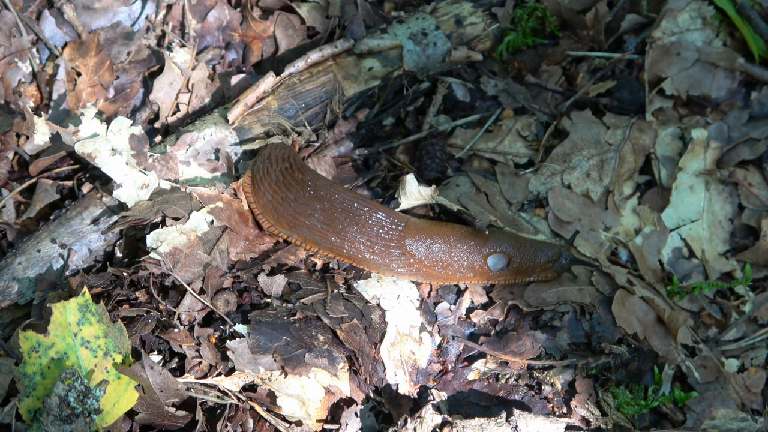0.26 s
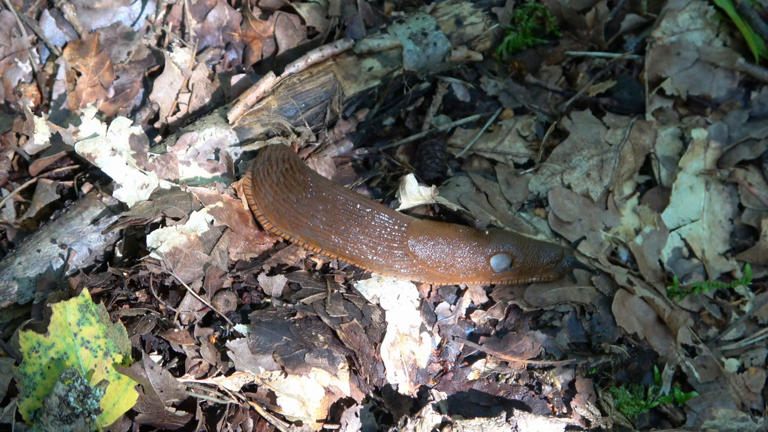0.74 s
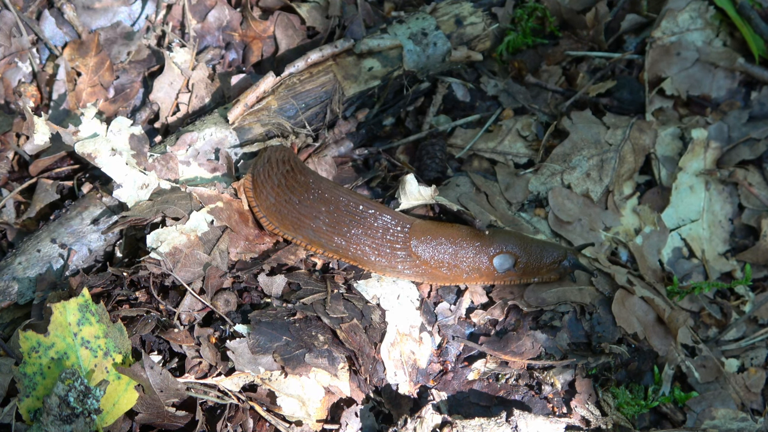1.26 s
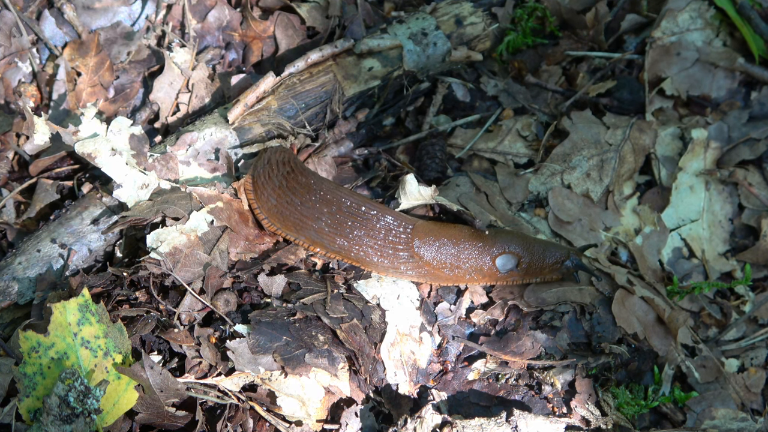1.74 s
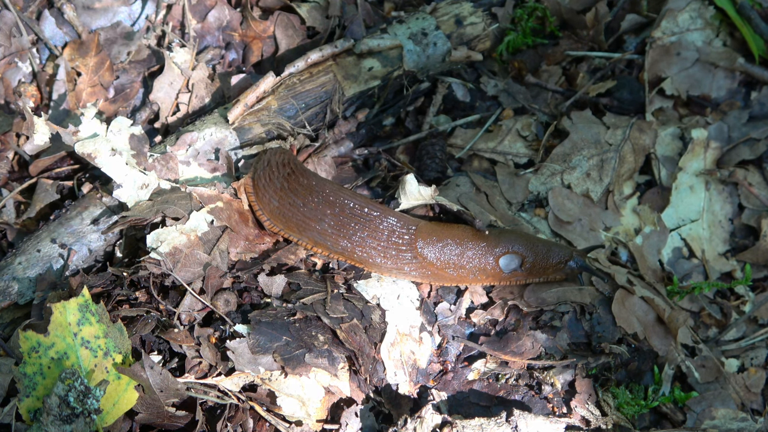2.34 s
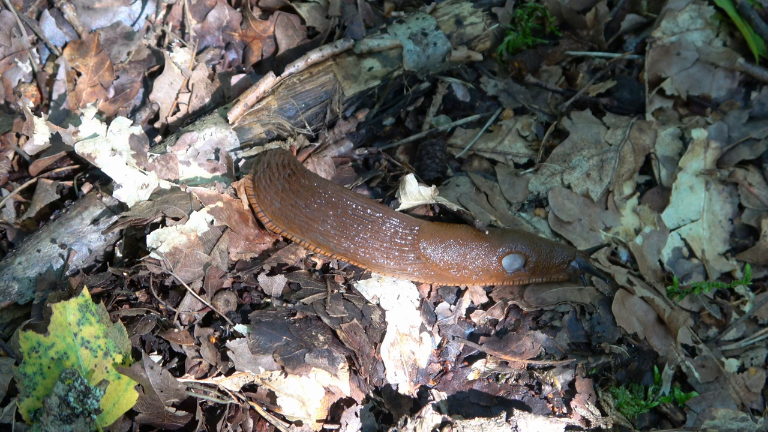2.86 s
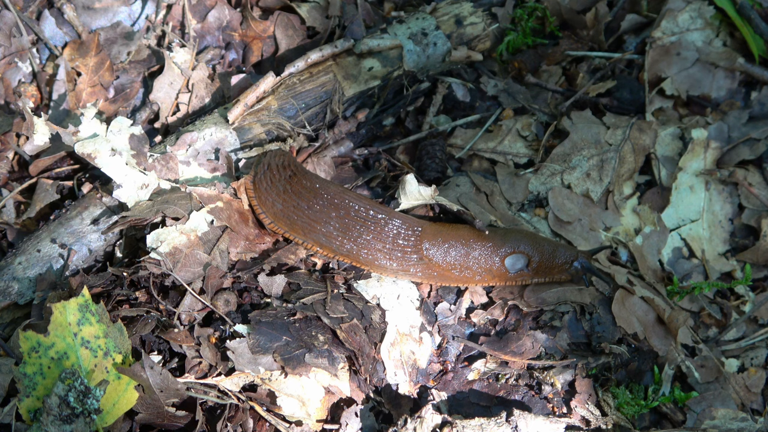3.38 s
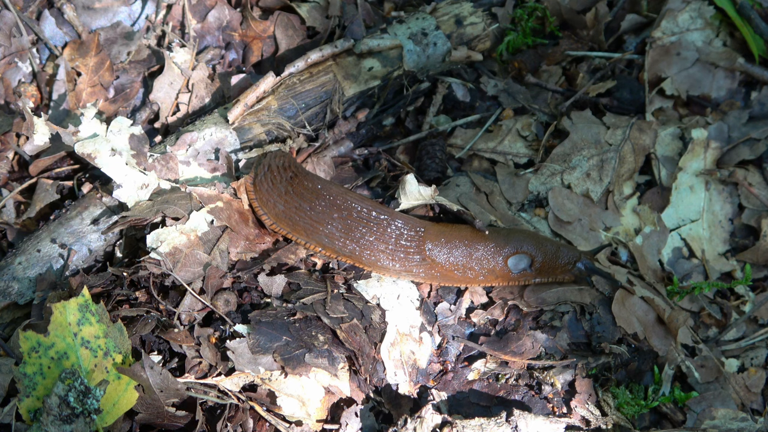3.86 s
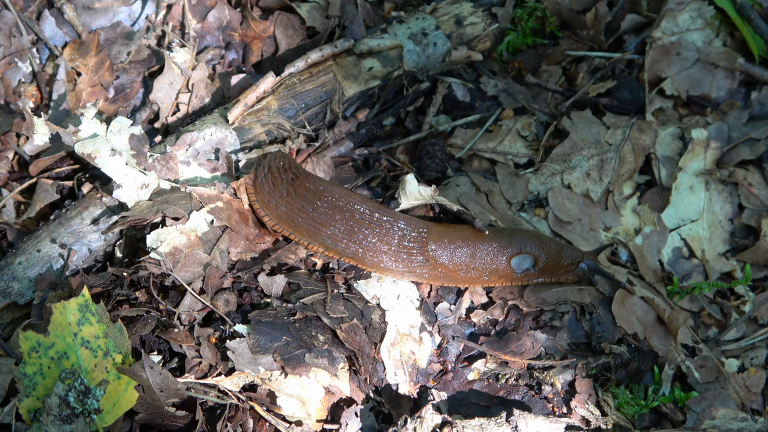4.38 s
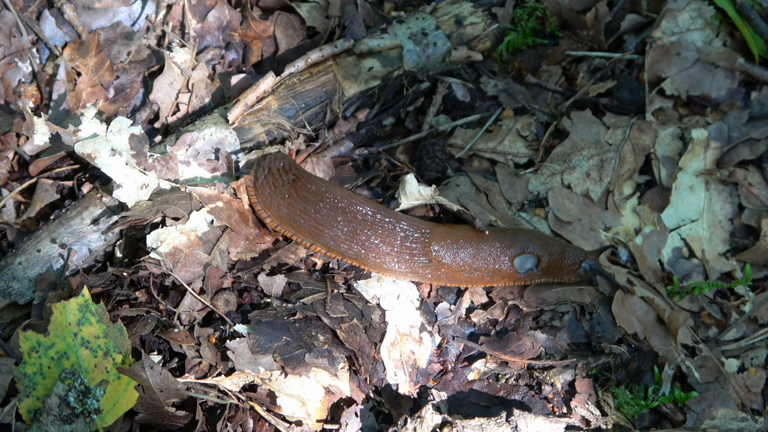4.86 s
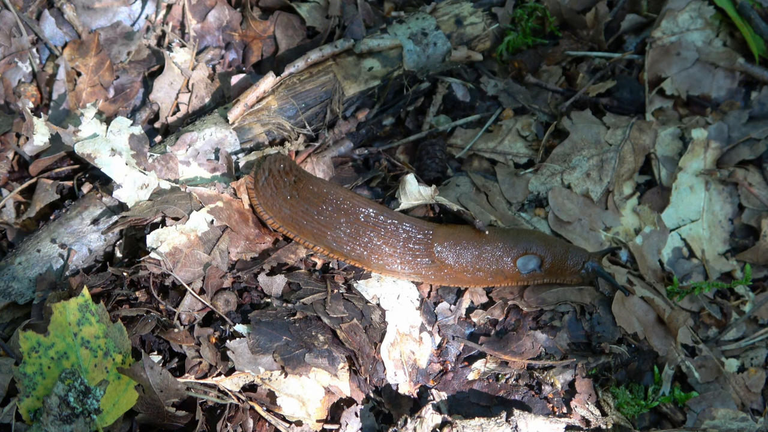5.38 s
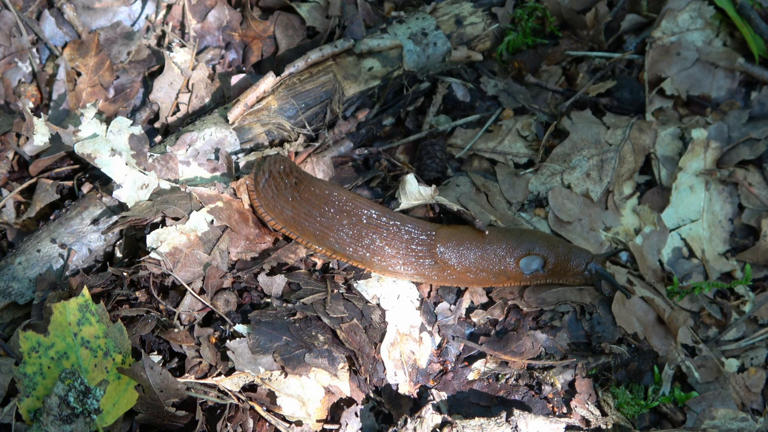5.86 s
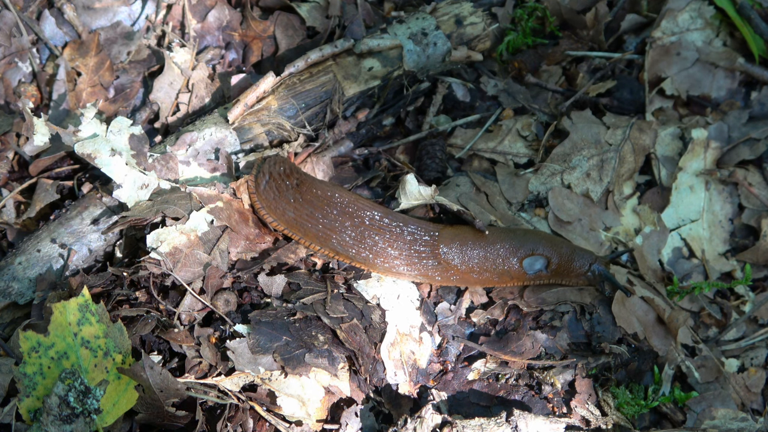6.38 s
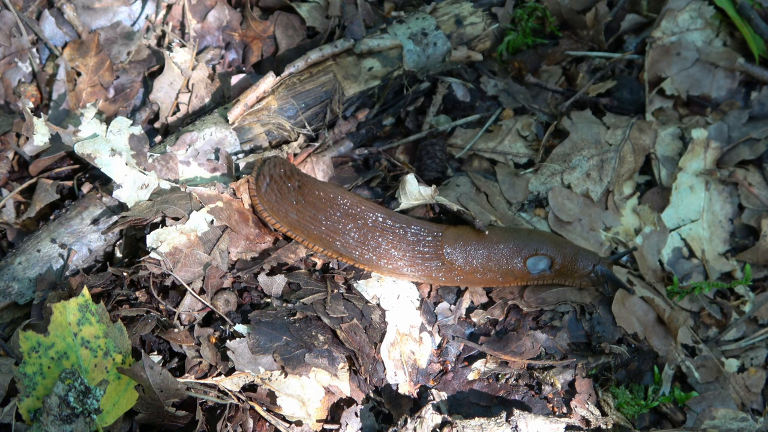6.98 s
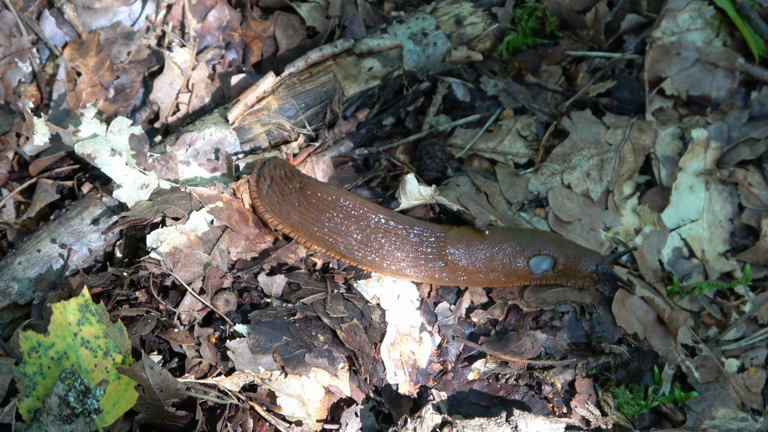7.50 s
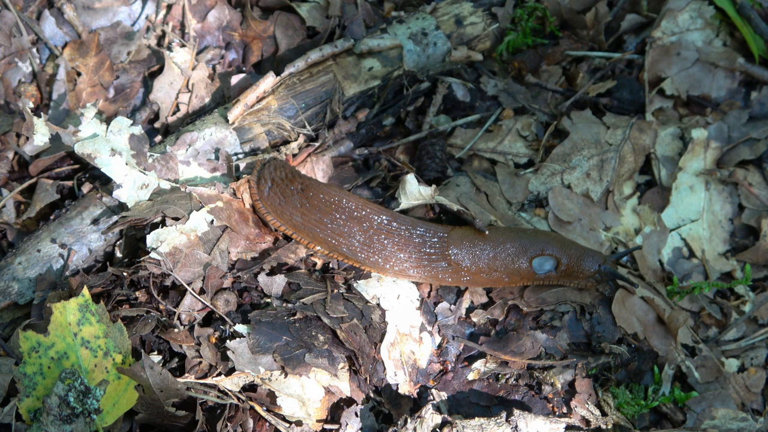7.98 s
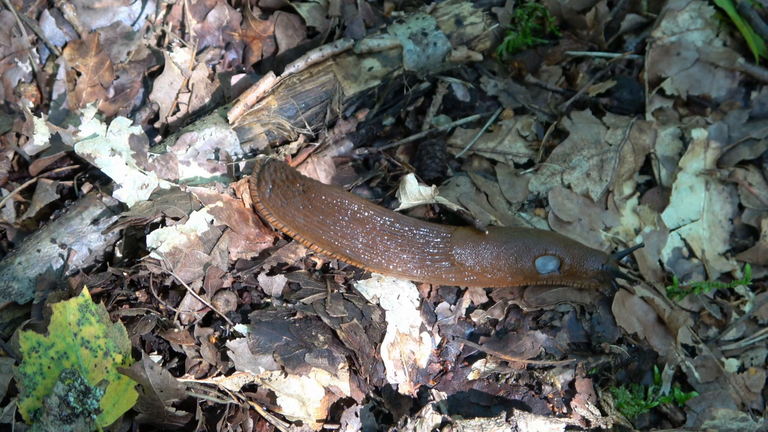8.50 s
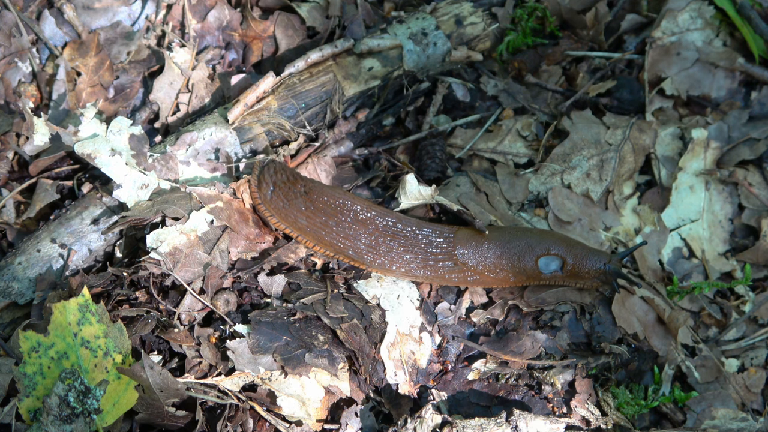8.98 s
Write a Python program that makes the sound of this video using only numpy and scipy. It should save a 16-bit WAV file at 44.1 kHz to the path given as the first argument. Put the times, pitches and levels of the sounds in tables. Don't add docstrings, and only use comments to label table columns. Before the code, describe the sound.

Birds at different distances around a stationary stereo microphone in woodland. Bright, hooked warbler chirps run through most of the scene, strongest past the middle, with mellow thrush notes mainly on the right early on. Dull distant caws recur throughout. A raptor mews near the start, middle and late, then a long finch trill ends with rising steps of down-swept notes. Low distant traffic, slow deep air pressure and light hiss stay underneath; the slug makes no sound.

```python
import sys
import numpy as np
from scipy import signal
from scipy.fft import rfft, irfft
from scipy.io import wavfile
from scipy.ndimage import uniform_filter1d

SR = 44100
rng = np.random.default_rng(int(sys.argv[2]) if len(sys.argv) > 2 else 0)


def magnitude_from_level(level_db):
    exponent = np.asarray(level_db, float) / 20
    return 10 ** exponent


def put_to_file(sound):
    columns = np.atleast_2d(sound).T
    safe = np.clip(columns, -1, 1)
    whole_steps = np.round(safe * 32767)
    wavfile.write(sys.argv[1], SR, whole_steps.astype(np.int16))


N = 407925
T = np.arange(N) / SR
HZ = np.fft.rfftfreq(N, 1 / SR)

# frequency in Hz, gain in dB.
RUMBLE_TONE = [(14, -42), (22, 1), (45, 0.5), (70, -4), (125, -14.5), (200, -17), (400, -25), (800, -29.5),
               (1300, -30.5), (1900, -38), (2600, -45), (4000, -46.5), (5500, -47), (8000, -86)]
# frequency in Hz, likeness from 0 to 1.
RUMBLE_LIKENESS = [(20, 0.94), (130, 0.84), (640, 0.52), (3000, 0.52)]
# time in seconds, level in dB.
AIR_STRENGTH = [(0.0, -36), (0.4, -31), (0.55, -44.5), (1.05, -22), (1.5, -32), (2.35, -26), (2.55, -41.5),
                (2.8, -39.5), (3.0, -40.5), (3.7, -27), (4.15, -47), (4.64, -35), (5.9, -48), (6.1, -31),
                (7.0, -34.5), (7.8, -43), (8.15, -30.5), (9.25, -33)]
# frequency in Hz, gain in dB per Hz.
AIR_TONE = [(.5, -1), (2, 14), (3.5, 8.5), (7, -1), (14, -7), (22, -14), (40, -77)]
# time in seconds, level in dB.
LOW_CHORUS = [(0, -104), (1.2, -71), (2.1, -65), (2.7, -75), (3.5, -69), (4.3, -64), (5.6, -59.5),
              (6.65, -58.5), (6.9, -63), (7.7, -56.5), (8.4, -62.5), (8.9, -56), (9.25, -61.5)]
# time in seconds, level in dB.
HIGH_CHORUS = [(0, -74), (0.8, -73), (1.3, -66.5), (2.3, -68), (2.7, -72), (3.2, -70.5), (4.4, -68.5),
               (5.69, -61.5), (6.3, -85), (6.8, -74), (7.25, -67.5), (7.45, -69), (8.1, -80), (9.25, -70)]
# start in seconds, long trill length in seconds, level in dB,
# left minus right of the lead-in in dB.
FINCH_PHRASES = [
    (-0.034, .76, 1, 4),
    (7.265, 1.0, 0, 3),
]
# seconds after its start, length in seconds, start in Hz, end in Hz,
# level in dB.
FINCH_LEAD_IN = [
    (0, 0.18, 8070, 7270, -69),
    (.135, .06, 7400, 6800, -57.5),
    (0.294, 0.19, 6870, 6930, -76),
]
# seconds after the phrase start, beat period in seconds, high bead in Hz,
# low bead in Hz, level in dB.
HIGH_TRILL = (.25, .0785, 6150, 5500, -56.5)
LOW_TRILL = (.511, .0626, 4920, 4570, -55)
# start in seconds, length in seconds, level in dB.
CROW_CAWS = [(0.022, 0.39, -61), (0.8, 0.27, -62), (1.697, 0.26, -56), (2.436, 0.37, -62),
             (2.838, 0.12, -62), (3.156, 0.25, -62.5), (3.863, 0.31, -64.5), (4.72, 0.23, -59),
             (4.958, 0.28, -60.5), (5.397, 0.2, -62), (5.919, 0.1624, -63), (6.192, 0.15, -63.5),
             (6.82, 0.6, -60.5), (7.583, 0.29, -61.5), (8.821, 0.36, -60)]
# frequency in Hz, width in Hz, gain in dB.
CROW_THROAT = [(1075, 210, -0.5), (1308, 152, -1)]
# start in seconds, length in seconds, top in Hz, landing in Hz,
# level in dB.
HELD_HOOKS = [(0.052, 0.042, 6500, 5150, -58.5), (0.405, 0.047, 5260, 4280, -56),
              (0.724, 0.038, 6000, 5240, -57), (1.07, 0.045, 6300, 5090, -61),
              (1.385, 0.064, 6220, 5100, -62), (1.721, 0.059, 6150, 4650, -58.5),
              (1.87, 0.059, 6550, 5200, -61.5), (2.072, 0.08, 5980, 4960, -59),
              (2.232, 0.05, 5870, 4660, -56.5), (2.881, 0.043, 7000, 5330, -58.5),
              (3.031, 0.098, 5960, 5040, -59), (3.83, 0.04, 6170, 5320, -61),
              (4.157, 0.064, 5650, 4770, -55), (4.76, 0.074, 6150, 4020, -54.5),
              (5.38, 0.058, 7000, 5610, -50.5), (5.424, 0.025, 5260, 3300, -47.5),
              (9.198, 0.084, 7700, 7050, -57)]
# start in seconds, length in seconds, top in Hz,
# landing in Hz, level in dB.
DROOPING_HOOKS = [
    (0.79, 0.049, 4300, 3790, -62),
    (2.385, 0.075, 5880, 4780, -59),
    (3.212, 0.08, 6250, 4910, -56.5),
    (3.531, 0.096, 6330, 4220, -64),
]
# start in seconds, length in seconds, top in Hz, landing in Hz,
# level in dB.
SAGGING_HOOKS = [
    (5.067, 0.11, 6820, 5150, -52),
    (5.7, 0.091, 7040, 5170, -50),
]
# start in seconds, length in seconds, start in Hz, end in Hz,
# level in dB.
WARBLER_SLIDES = [(0.118, 0.028, 4300, 3600, -64), (0.17, 0.048, 3800, 4840, -65.5),
                  (1.09, 0.046, 4200, 4370, -60), (1.512, 0.052, 5030, 5080, -64),
                  (2.128, 0.017, 4520, 3630, -90), (2.18, 0.027, 3430, 4530, -72),
                  (3.868, 0.012, 5300, 4650, -67), (4.51, 0.026, 3860, 3920, -64),
                  (4.832, 0.018, 4060, 3370, -57), (5.13, 0.042, 4450, 3350, -62),
                  (5.188, 0.017, 5170, 3780, -56), (5.508, 0.012, 3650, 3980, -53),
                  (5.518, 0.019, 3920, 3500, -54.5), (5.765, 0.038, 4500, 3700, -57.5),
                  (5.81, 0.052, 4480, 5100, -60.5), (6.092, 0.17, 4380, 4350, -75.5),
                  (8.473, 0.067, 3990, 4000, -69)]
# start in seconds, length in seconds, start in Hz, end in Hz, level in dB.
LEFT_BIRD_SLIDES = [
    (2.594, 0.058, 4050, 4310, -68),
    (2.66, 0.035, 3630, 3740, -65),
    (2.686, 0.02, 3750, 2810, -67),
    (2.734, 0.041, 4130, 4040, -60),
    (6.488, 0.073, 4380, 4100, -75),
]
# time in seconds, pitch in Hz, effort in dB.
RAPTOR_MEWS = [
    [(1.22, 774, -68), (1.252, 1166, -51), (1.285, 1365, -61), (1.4, 1412, -66), (1.46, 1232, -54.5),
     (1.6, 1091, -53), (1.8, 1002, -54), (1.94, 921, -56.5), (2.01, 737, -61.5)],
    [(5.325, 1115, -49), (5.37, 1323, -54), (5.43, 1363, -56), (5.52, 1177, -49), (5.72, 999, -53.5),
     (5.79, 1026, -50.5), (5.9, 937, -55), (6.05, 866.5, -54), (6.18, 744, -61.5)],
    [(7.165, 1154, -50), (7.22, 1328, -51.5), (7.35, 1335, -66), (7.4, 1256, -47.5), (7.49, 1080, -51.5),
     (7.6, 979, -51.5), (7.82, 939, -52.5), (7.9, 866, -55.5), (7.99, 766, -58)],
]
# frequency in Hz, gain in dB.
RAPTOR_THROAT = [(750, -6.5), (1000, -8), (1200, -11.5), (1400, -1), (1900, 2.5), (2400, -5.5), (2800, 3),
                 (3500, -26)]
# start in seconds, length in seconds, start in Hz, end in Hz, level in dB.
RIGHT_THRUSH = [(1.555, 0.04, 2980, 2950, -56.5), (1.619, 0.045, 2910, 2920, -71),
                (1.76, 0.029, 3040, 3220, -59), (1.795, 0.069, 2600, 2380, -57.5),
                (1.995, 0.05, 2950, 2990, -56), (2.24, 0.047, 2900, 3160, -57.5),
                (2.292, 0.052, 2300, 2290, -62), (1.43, 0.032, 2310, 2270, -57),
                (2.92, 0.12, 2580, 2525, -66.5), (3.03, 0.045, 2700, 2610, -59.5),
                (3.172, 0.08, 2740, 3180, -55.5), (3.6, 0.029, 2800, 2720, -59),
                (3.674, 0.064, 2480, 2480, -60.5), (3.698, 0.036, 2840, 2660, -59),
                (3.839, 0.045, 2650, 2524, -57), (3.845, 0.063, 2850, 2800, -60.5),
                (4.3, 0.067, 2040, 2680, -58.5), (6.748, 0.053, 3640, 3440, -65)]
# start in seconds, length in seconds, start in Hz, end in Hz,
# level in dB.
LEFT_THRUSH = [
    (2.04, 0.056, 1980, 1970, -63),
    (2.08, 0.053, 2410, 2410, -61),
    (4.47, 0.064, 3180, 3090, -64.5),
    (7.071, 0.066, 3870, 4180, -69),
]
# frequency in Hz, gain in dB per Hz.
HISS_TONE = [(1500, -6.5), (5000, -3), (8000, -5), (15500, -3)]


def level(x, db):
    return x * magnitude_from_level(db) / np.sqrt(np.mean(x ** 2))


def over_hz(table):
    hz, value = np.transpose(table)
    return np.interp(np.log(HZ + 1e-3), np.log(hz), value)


def over_time(table):
    return magnitude_from_level(np.interp(T, *np.transpose(table)))


def colour(x, gain):
    return irfft(rfft(x) * gain, N)


def walk(rate, size):
    k = max(int(SR / rate), 1)
    steps = np.repeat(rng.standard_normal(size // k + 1), k)
    return 1.212 * uniform_filter1d(uniform_filter1d(steps, k), k)[:size]


def add(out, s, wave, pan_db):
    i = int(s * SR)
    wave, i = wave[max(-i, 0):N - i], max(i, 0)
    out[:, i:i + len(wave)] += wave * magnitude_from_level(np.array([[pan_db / 2], [-pan_db / 2]]))


def whistle(hz, db, rise, fall):
    t = np.arange(len(hz)) / SR
    edge = np.clip(t / rise, 0, 1) * np.clip((t[-1] - t) / fall, 0, 1)
    tone = np.sin(2 * np.pi * np.cumsum(hz) / SR + rng.uniform(0, 6.43))
    return np.sqrt(2) * magnitude_from_level(db) * np.sin(np.pi / 2 * edge) * tone


def trunks(x, direct_db, wet_db, t60):
    t = np.arange(int(0.7 * SR)) / SR
    fade = np.exp(-np.log(1000) * t / t60) * (1 - np.exp(-t / 0.0093))
    tail = rng.standard_normal((2, len(t))) * fade
    tail = tail / np.sqrt(np.sum(tail[0] ** 2))
    wet = signal.fftconvolve(x.mean(axis=0, keepdims=True), tail, axes=1)[:, :N]
    swayed = T - 1.6e-4 * np.interp(T, T[::50], walk(1500, N // 50 + 1))
    wet = np.array([np.interp(swayed, T, port) for port in wet])
    return magnitude_from_level(direct_db) * x + magnitude_from_level(wet_db) * (0.5 * wet.mean(axis=0) + 0.8 * wet)


def rumble():
    mid, side = rng.standard_normal((2, N))
    alike = np.clip(over_hz(RUMBLE_LIKENESS), 0, 1)
    tone = magnitude_from_level(over_hz(RUMBLE_TONE))
    mid = colour(mid, tone * np.sqrt(1 + alike))
    side = colour(side, tone * np.sqrt(1 - alike))
    return level(np.array([mid + side, 0.98 * (mid - side)]), -42)


def air():
    mid, side = colour(rng.standard_normal((2, N)), magnitude_from_level(over_hz(AIR_TONE)))
    swing = level(np.array([mid + 0.46 * side, mid - 0.25 * side]), 0)
    return swing * over_time(AIR_STRENGTH)


def chorus(strength, low_hz, high_hz, pan_db):
    out = np.zeros((2, N))
    for at, pitch, bend, size, side in rng.random((600, 5)):
        glide = np.linspace(1, 1 + 0.2 * (bend - 0.6), int(0.035 * SR))
        hz = (low_hz + (high_hz - low_hz) * pitch) * glide
        add(out, at * T[-1], whistle(hz, 5 * size, 0.0088, 0.0088), pan_db + 24 * (side - 0.5))
    return level(trunks(out, -5.5, 0, 1.0), 0) * over_time(strength)


def sweep(length, start_hz, end_hz, db):
    size = int(length * SR)
    hz = np.linspace(start_hz, end_hz, size) + 30 * walk(89, size)
    return whistle(hz, db + 2.8 * walk(63, size), 0.058, 0.079)


def trill(length, period, high_hz, low_hz, db):
    out = np.zeros((2, int((length + 2 * period) * SR)))
    t = np.linspace(-1, 1, int(0.3 * period * SR))
    fade_db_per_s, blur_share = 7, 0.17
    for s in np.arange(0, length, period):
        for bead, bead_db in enumerate((0, -2.5, -1)):
            pitch, size = rng.standard_normal(2)
            bend = (1 - bead) * (0.3 - t ** 2) * 0.45 - 0.22 * t
            hz = high_hz + (low_hz - high_hz) * (bead / 2 - bend) + 30 * pitch
            hz = hz + blur_share * (high_hz - low_hz) * walk(303, len(t))
            note_db = db + bead_db - fade_db_per_s * s + 1.8 * size
            add(out, s + bead * 0.28 * period, whistle(hz, note_db, 0.008, 0.008), 0)
    return out[0]


def finch():
    out = np.zeros((2, N))
    high_s, *high_beat = HIGH_TRILL
    low_s, *low_beat = LOW_TRILL
    high_length = 2.5 * high_beat[0]
    for start, long_s, db, pan_db in FINCH_PHRASES:
        for s, *note in FINCH_LEAD_IN:
            add(out, start + s, magnitude_from_level(db) * sweep(*note), pan_db)
        add(out, start + high_s, magnitude_from_level(db) * trill(high_length, *high_beat), -1.1)
        add(out, start + low_s, magnitude_from_level(db) * trill(long_s, *low_beat), -1.1)
    for k in range(3):
        climb_hz = 203 * k
        add(out, 8.607 + 0.211 * k, sweep(0.1, 5570 + climb_hz, 3400 + climb_hz, -52 + 3 * k), -2.7)
    return trunks(out, -0.3, 0.3, 0.65)


def crows():
    out = np.zeros((2, N))
    pulse_hz = 106.96
    for s, length, db in CROW_CAWS:
        size = int(length * SR)
        hz = pulse_hz * (1 + 0.02 * walk(7, size) + 0.01 * walk(40, size) + 0.01 * rng.standard_normal())
        for k in range(7, 16):
            add(out, s, whistle(k * hz, db - 1.5 + 4 * walk(30.8, size), 0.016, 0.021), 2.5)
    throat = sum(magnitude_from_level(db) / (1 + ((HZ - hz) / (width / 2)) ** 4) for hz, width, db in CROW_THROAT)
    return trunks(colour(out, throat), -5.0, -6, 0.84)


def small_birds():
    out = np.zeros((2, N))
    warbler_pan_db, left_bird_pan_db = -2, 7
    for notes, sag_hz in ((HELD_HOOKS, 0), (DROOPING_HOOKS, 3000), (SAGGING_HOOKS, 9500)):
        for s, length, top_hz, land_hz, db in notes:
            t = np.arange(int(length * SR)) / SR
            drop = np.exp(-t / 0.0045)
            hz = land_hz - sag_hz * t + (top_hz - land_hz) * drop + 45 * walk(89, len(t))
            note_db = db - 9 * drop + 1.5 * walk(54, len(t)) - 7 * t / length
            add(out, s, whistle(hz, note_db, 0.004, 0.012), warbler_pan_db)
    for notes, pan_db in ((WARBLER_SLIDES, warbler_pan_db), (LEFT_BIRD_SLIDES, left_bird_pan_db)):
        for s, length, start_hz, end_hz, db in notes:
            hz = np.linspace(start_hz, end_hz, int(length * SR))
            add(out, s, whistle(hz, db, 0.0015, 0.006), pan_db)
    return trunks(out, 0, -1.5, 0.55)


def raptor():
    out = np.zeros((2, N))
    for mew in RAPTOR_MEWS:
        s, pitch, effort = np.transpose(mew)
        t = np.arange(s[0], s[-1], 1 / SR)
        effort_db = np.interp(t, s, effort)
        hz = uniform_filter1d(np.interp(t, s, pitch), size=450)
        hz = hz * (1 + 0.007 * walk(25, len(t)) + 0.005 * walk(90, len(t)))
        for k, source_db in enumerate((0, 0, -24), start=1):
            throat_db = np.interp(k * hz, *np.transpose(RAPTOR_THROAT))
            flutter_db = 1.8 * walk(39.4, len(t))
            add(out, s[0], whistle(k * hz, effort_db + source_db + throat_db + flutter_db, 0.006, 0.01), 3)
    return trunks(out, -0.8, -1.8, 0.8)


def thrush():
    out = np.zeros((2, N))
    for notes, pan_db in ((RIGHT_THRUSH, -9), (LEFT_THRUSH, 4)):
        for s, length, start_hz, end_hz, db in notes:
            size = int(length * SR)
            shake = np.sin(2 * np.pi * 70 * np.arange(size) / SR + rng.uniform(0, 2 * np.pi))
            shake_hz = min(80 + abs(end_hz - start_hz), 260)
            hz = np.linspace(start_hz, end_hz, size) + shake_hz * shake + 50 * walk(119, size)
            add(out, s, whistle(hz, db + 1.8 * walk(99, size), 0.0038, 0.025), pan_db)
    return trunks(out, -2.3, -0.67, 0.74)


def knock():
    out = np.zeros((2, N))
    add(out, 9.14, whistle(np.full(int(0.1 * SR), 195.0), -52, 0.0088, 0.056), 1.7)
    return out


def scene():
    far = crows() + chorus(LOW_CHORUS, 1472.6, 2300, 8.1) + chorus(HIGH_CHORUS, 2400, 4700, -1.2)
    near = finch() + small_birds() + raptor() + thrush()
    return rumble() + air() + far + near + knock()


def top_cut(x):
    return signal.sosfilt(signal.butter(12, 16410, fs=SR, output="sos"), x)


def record(dry):
    hiss = level(colour(rng.standard_normal((2, N)), magnitude_from_level(over_hz(HISS_TONE))), -58.5)
    top_hz = 15730
    return top_cut(colour(dry + hiss, HZ < top_hz))


dry = scene()
out = record(dry)
put_to_file(out)
```